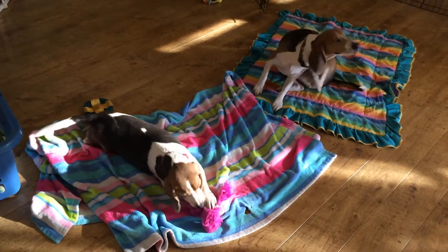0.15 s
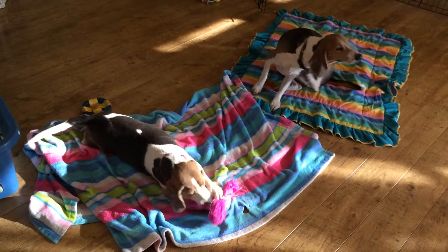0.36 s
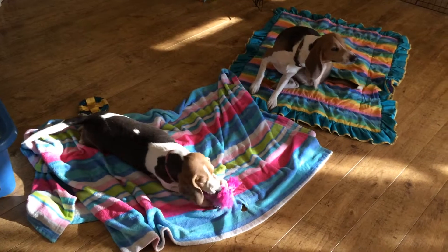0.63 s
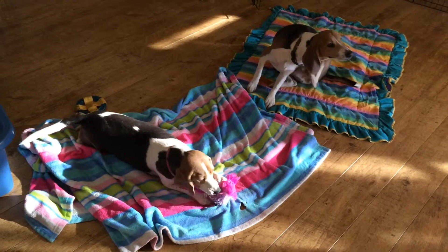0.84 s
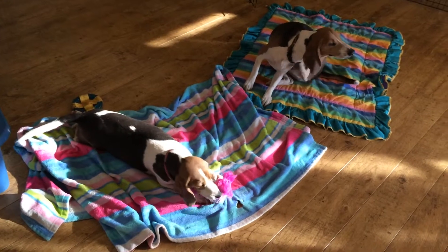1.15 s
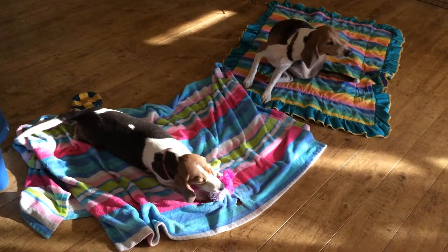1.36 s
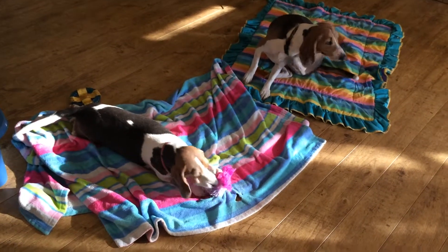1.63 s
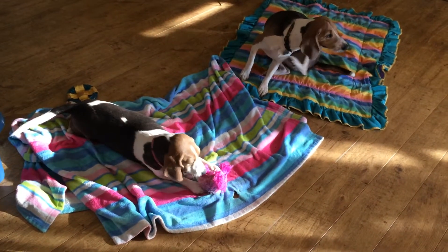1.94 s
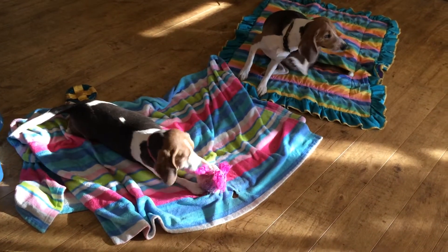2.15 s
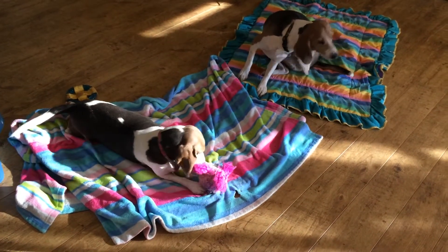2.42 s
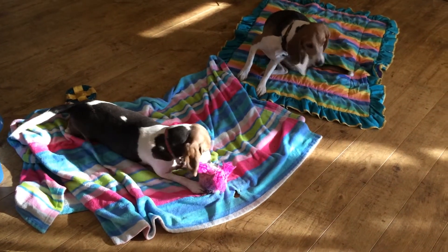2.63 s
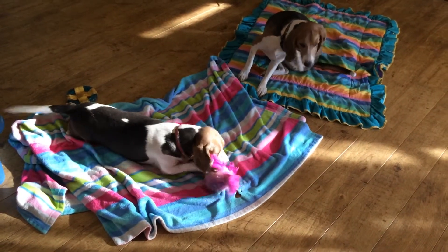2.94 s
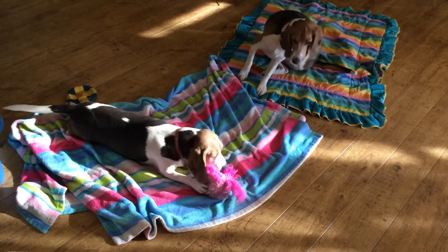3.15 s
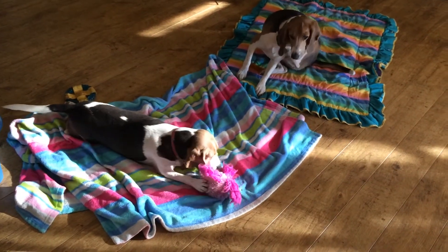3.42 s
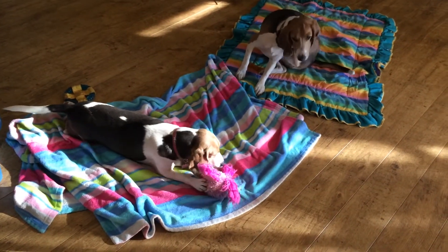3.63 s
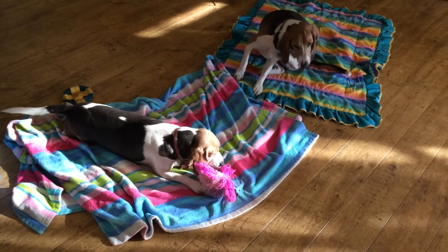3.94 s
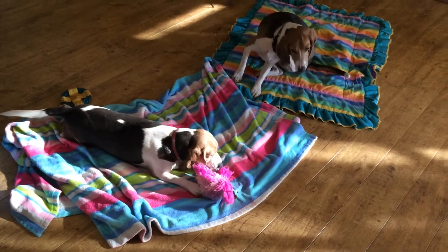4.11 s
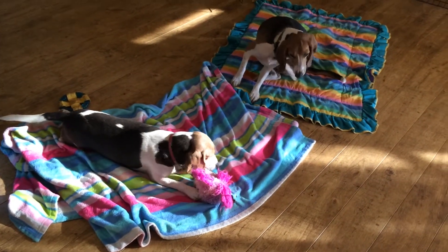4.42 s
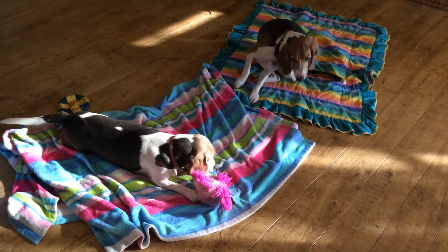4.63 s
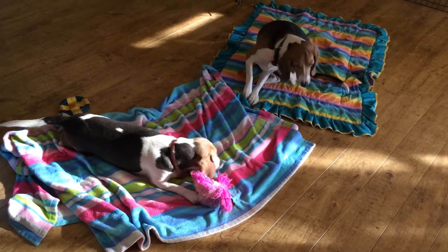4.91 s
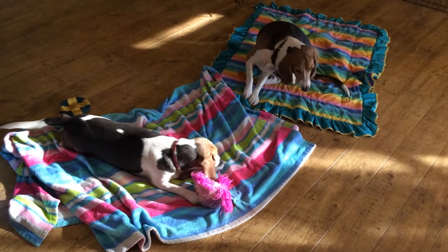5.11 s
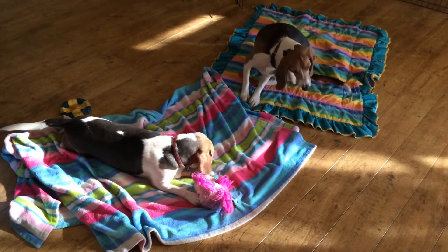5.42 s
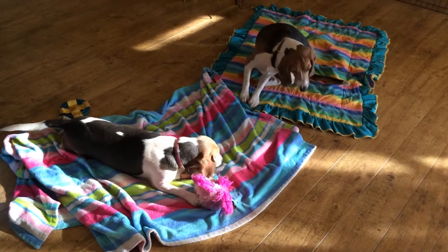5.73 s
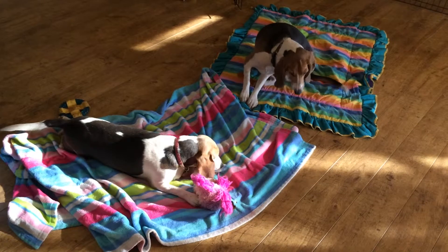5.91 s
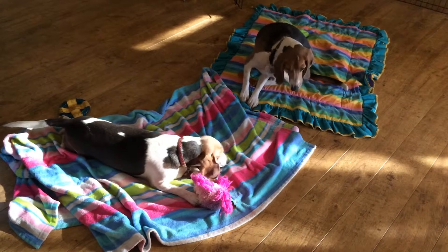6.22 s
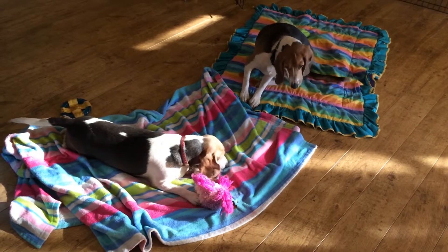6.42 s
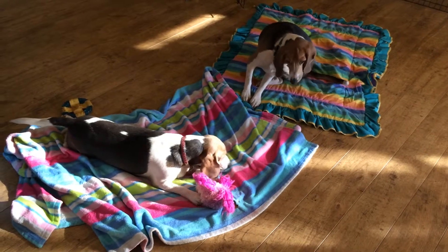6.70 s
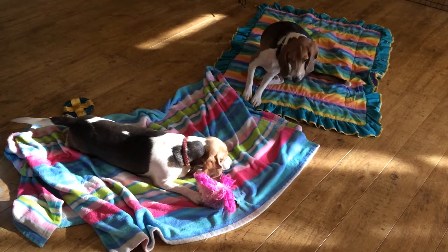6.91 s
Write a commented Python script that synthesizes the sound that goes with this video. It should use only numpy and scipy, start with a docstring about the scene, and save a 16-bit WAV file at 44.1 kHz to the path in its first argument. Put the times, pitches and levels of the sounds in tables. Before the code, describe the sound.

A dog gnaws a soft toy indoors, its metal collar tags clacking and jingling in quick irregular bursts over a faint low appliance hum.

```python
"""In a small bare room with a wooden floor, a dog worries a soft toy and its collar tags clack and ring.
Each clack is noise through damped resonances plus the decaying sine modes of two metal tags.
A scuff leads each blow and light bounces follow; a fine jingle and single low tag modes lie between.
Diffuse noise tails form the room; wavering sines form an appliance's hum and faint higher harmonics.
Shaped noise gives the room's rumble and the phone's hiss."""
import sys
import numpy as np
from scipy import signal
from scipy.fft import rfft, irfft, next_fast_len
from scipy.io import wavfile

SR = 44100
rng = np.random.default_rng(int(sys.argv[2]) if len(sys.argv) > 2 else 0)


def inscribe(sig):
    """Save sig as 16-bit PCM at rate SR to the path in sys.argv[1].

    A 1-D sig is mono; a 2-D sig holds one channel per row.
    Samples are clipped to [-1, 1] before scaling.
    """
    pcm = np.round(np.clip(np.atleast_2d(sig).T, -1, 1) * 32767)
    wavfile.write(sys.argv[1], SR, pcm.astype(np.int16))


N = 311346

# Contacts that stand out: [t/s, clack level/dB, dull knock level/dB re clack,
# blow on small tag level/dB, blow on large tag level/dB]
CONTACTS = [(0.032, -42, -22, -44, -38), (0.042, -34.5, -13, -30, -24), (0.155, -35, -15, -29.5, -31),
            (0.171, -35, -20, -31, -30.5), (0.249, -34.5, -15, -54, -46), (0.309, -35, -2.5, -56, -25.5),
            (0.415, -36, -4.5, -34, -36), (0.487, -33, -28, -49, -25), (0.503, -31, -10.5, -54, -27.5),
            (0.515, -32, -27, -54, -28), (0.641, -38.5, -10, -29, -29), (0.721, -47.5, -5.5, -62, -52),
            (0.965, -39.5, -10, -47, -42), (0.98, -36, -18, -46, -45), (1.08, -32, -15.5, -27, -34),
            (1.135, -44, -19, -59, -37), (1.216, -35, -14, -46, -45), (1.244, -34, -17, -53, -60),
            (1.314, -37, -5.5, -58, -47), (1.401, -30.5, -16.5, -30, -41), (1.519, -29, -13, -33, -42),
            (1.534, -33, -6, -34, -36), (1.541, -28.5, -8.5, -24, -45), (1.651, -35, -11, -25, -24.5),
            (1.67, -33.5, -27, -26, -27), (1.688, -27.5, -14, -22, -32), (1.756, -33.5, -14, -32, -36.5),
            (1.872, -27, -21.5, -30, -21), (1.901, -27, -20, -30, -29.5), (1.973, -29, -22, -36, -40),
            (1.983, -29.5, -30, -29, -32), (2.001, -20, -13, -18, -21.5), (2.118, -46, -20, -46, -45),
            (2.147, -20.5, -17.5, -16, -23), (2.151, -18.5, -21, -18, -26), (2.231, -16, -17.5, -16.5, -33),
            (2.249, -37, -19, -30, -35), (2.358, -37.5, -15, -21, -43), (2.367, -27, -32, -19, -29),
            (2.434, -35, -18, -31, -42), (2.445, -21, -25, -13, -25), (2.467, -31, -9, -33, -42),
            (2.488, -27, -9.5, -33, -34), (2.548, -30.5, -27, -28, -31), (2.578, -33, -31, -24, -39),
            (2.611, -29.5, -21, -29, -33), (2.663, -31.5, -15, -22, -33), (2.6843, -13, -23, -13, -20),
            (2.687, -18, -7.5, -24, -32), (2.826, -26, -12, -26, -21), (2.832, -20.5, -20, -13.5, -30),
            (2.911, -21, -14.5, -32, -37), (2.9245, -21, -17.5, -11, -23), (2.932, -23.5, -28, -16, -20.5),
            (3.047, -28.5, -26, -31, -32), (3.08, -31, -14, -26, -35), (3.11, -31, -12, -31, -35),
            (3.12, -22, -12, -33, -35), (3.131, -25.5, -6.5, -30, -41), (3.196, -33, -7.5, -36, -49),
            (3.27, -37, -19, -47, -60), (3.304, -34, -21, -35, -34), (3.37, -38.5, 1, -47, -48),
            (3.382, -23, -36, -18.5, -32), (3.395, -44, -8, -32, -26), (3.457, -35, -30, -36, -55),
            (3.519, -22.5, -9, -31, -35), (3.561, -31.5, -27, -31, -53), (3.574, -18.5, -6, -18, -25),
            (3.592, -20, -32, -21, -26), (3.687, -33, -15, -31, -23.5), (3.751, -19, -15, -15.5, -15.5),
            (3.985, -38.5, -17, -45, -49), (4.043, -34, -10, -19, -35), (4.053, -18.5, -28, -32, -23),
            (4.07, -23.5, -13, -57, -49), (4.181, -28, -19, -32, -25.5), (4.217, -22.5, -14, -16, -21.5),
            (4.279, -28.5, -16, -22, -25.5), (4.407, -32.5, -21, -24, -35), (4.449, -27.5, -12.5, -24, -23),
            (4.504, -32.5, -26, -38, -33), (4.547, -28.5, -8, -59, -52), (4.5592, -24.5, -23, -29, -27),
            (4.588, -30.5, -32, -37, -28), (4.637, -38, -14, -33, -42), (4.6821, -23.5, -13, -27, -31),
            (4.748, -25, -12.5, -23, -50), (4.873, -43, -30, -42, -40), (4.885, -21, -30, -11.5, -31),
            (4.918, -26, -22.5, -31, -25.5), (4.949, -31, -21, -29, -35), (4.991, -33, -9.5, -50, -39),
            (5.041, -38, -17, -39, -35), (5.137, -26, -14, -31, -25), (5.14, -25.5, -15.5, -39, -25),
            (5.266, -48, -25, -48, -56), (5.45, -22.5, -21, -22, -23), (5.58, -35.5, -17, -46, -46),
            (5.632, -37, -15, -28, -45), (5.647, -30, -17, -28, -41), (5.6578, -14.5, -8, -37, -59),
            (5.662, -21, -8.5, -19, -30), (5.815, -34, -15.5, -34, -36), (5.91, -20, -14.5, -17.5, -36),
            (5.957, -32, -27, -25, -39), (6.048, -37, -5, -51, -52), (6.078, -24, -16.5, -19, -28),
            (6.142, -34, -26, -31, -45), (6.276, -38, -20, -33, -55), (6.3, -24, -23, -37, -32),
            (6.307, -26.5, -15, -36, -42), (6.35, -35, -12, -38, -42), (6.364, -18, -9.5, -29, -28),
            (6.501, -46, -22, -38, -48), (6.517, -25, -19, -18, -22), (6.583, -27.5, -20, -30, -30),
            (6.6123, -20, -12.5, -23, -31), (6.711, -33, -22, -29, -34), (6.779, -30.5, -23, -23, -36),
            (6.848, -40, -34, -35, -38), (6.867, -34, -7, -40, -52), (6.876, -32.5, -22, -34, -38),
            (7.003, -27.5, -21, -43, -45), (7.0323, -35.5, -18, -28, -26)]
# Damped resonances of a contact: [f/Hz, width of one resonator/Hz, relative level/dB]
KNOCK_RESONANCES = [(1760, 1590, -2), (2924, 800, 4), (4220, 2100, 2.5)]
CLACK_RESONANCES = [(4510, 1280, -10.5), (6390, 2150, -5), (8183, 1100, 3.5), (9315, 1110, -5.5),
                    (11050, 1100, -5.5)]
TICK_RESONANCES = [(12500, 800, -1), (14550, 700, 0)]  # first row for the large tag, second for the small
# Modes of the tags: [f/Hz, relative level/dB, middle T60/s]
SMALL_TAG_MODES = [(4670, -30, 0.34), (9330, -9, 0.13), (14730, 0, 0.083)]
LARGE_TAG_MODES = [(4220, -32, 0.36), (7700, -16, 0.12), (8130, -10.5, 0.14), (12300, -1.5, 0.19),
                   (12760, -5.5, .17)]
# Middle level of each hum line: [f/Hz, level/dB]; the first line takes its level from HUM_SWELL
HUM_LINES = [(59.2, -51), (118.4, -62), (193.8, -64.5), (258.4, -63)]
# Slow swell of the lowest hum line: [t/s, level/dB]
HUM_SWELL = [(0.1, -51.5), (0.7, -47), (2.6, -48.5), (4.0, -52), (4.8, -49.5), (5.2, -46.5), (6.0, -47),
             (6.4, -52.5), (7.0, -50)]
# Spectral shape of rumble and hiss: [f/Hz, relative density level/dB per Hz]
AIR_SPECTRUM = [(30, -7.5), (60, -7), (110, -8), (250, -11), (400, -21), (700, -25), (2000, -29.5),
                (5000, -37.5), (15000, -47)]
# Reverberation time of the room: [f/Hz, T60/s]
ROOM_T60 = [(1000, 0.26), (3000, 0.53), (7000, 0.3), (14000, 0.2)]
# Faint higher harmonics of the motor that come and go: [f/Hz, middle level/dB, start t/s, end t/s]
MOTOR_TONES = [(522, -71, 0, 1.6), (764, -74, 1.6, 3.1), (930, -74, .95, 1.3), (945, -72, 2.2, 2.45),
               (1179, -76, 2.9, 6.9)]
# How busily the collar shivers between blows: [t/s, base level of the fine jingle/dB]
SHIVER_LEVEL = [(0, -48), (0.2, -45), (0.45, -55.5), (0.8, -58), (1.3, -58), (1.8, -68), (2.3, -61),
                (3.15, -49), (3.5, -50), (3.9, -58.5), (4.4, -93), (5.0, -46), (5.3, -67), (5.75, -53.5),
                (6.2, -66), (6.45, -46), (7.0, -65)]
# How freely the tags hang clear of the fur:
# [t/s, small tag ring level/dB re blow, large tag ring level/dB re blow]
TAG_FREEDOM = [(0, 3, -8.5), (0.8, -21, -12), (1.5, -14, -6), (2.4, -15, -8.5), (3.2, -5, -4.5),
               (4.2, -12, -14), (5.2, -0.5, -6.5), (6.1, -6, 2), (7.0, -7, -20)]
# Blows that set one low mode of a tag or ring humming: [t/s, mode f/Hz, level/dB]
FACE_BLOWS = [(0.044, 4670, -46), (0.56, 4670, -46), (0.65, 4670, -52), (1.874, 4200, -49),
              (2.004, 2934, -50.5), (2.03, 4600, -58), (2.49, 3016, -48), (2.931, 4220, -43),
              (3.388, 4220, -42), (3.6, 4220, -40.5), (4.561, 4670, -42), (6.082, 4220, -53),
              (6.868, 3170, -55.5)]
# Pitch of the clack, lower while the collar hangs slack: [t/s, pitch factor]
CLACK_PITCH = [(0.7, 1.02), (1.15, 0.77), (1.5, 1.016), (1.9, 1.12)]

AIR_DB = -53  # rms level
# Swing of a tag: random phase and strength, and how many new values are drawn a second
SWING_RAD, SWING_DB, SWING_RATE_HZ = 0.8, 3.5, 70
SWING_AT_HZ = 12000  # in ring(), phase and strength scale with mode pitch over this one
MIDDLE_CLACK_DB = -30
RING_LOSS = 0.19  # dB of ring lost per dB of clack above the middle
FACE_T60_S = 0.22
STEP_HZ, CUT_HZ = 15120, 16500


def undb(db):
    """Amplitude ratio: 20 dB for each factor of ten."""
    return 10 ** (np.asarray(db) / 20)


def unit(x):
    """Normalization by signal power: each row gets rms 1."""
    return x / np.sqrt(np.mean(x ** 2, axis=-1, keepdims=True))


def decay(t, t60):
    """Exponential decay: amplitude falls by 60 dB in t60 seconds."""
    return np.exp(-np.log(1000) * t / t60)


def on_log_hz(table, hz):
    """Logarithmic pitch scale: values are interpolated along log frequency."""
    f, v = np.transpose(table)
    return np.interp(np.log(np.maximum(hz, 1)), np.log(f), v)


def sway(rows, t, rate_hz):
    """Irregular modulation: random values, rate_hz a second, joined by straight lines."""
    place = t * rate_hz
    knots = rng.standard_normal((rows, 2 + int(place[-1])))
    return np.array([np.interp(place, np.arange(len(row)), row) for row in knots])


def add(out, starts_s, sounds):
    """Superposition: each row is mixed in at its start time."""
    for s, row in zip(starts_s, sounds):
        i = int(s * SR)
        out[i:i + len(row)] += row[:max(N - i, 0)]


def air():
    """Broadband noise: random pressure with a falling spectrum gives room rumble and microphone hiss."""
    size = next_fast_len(N)
    hz = np.arange(size // 2 + 1) * SR / size
    spectrum = rfft(rng.standard_normal(size)) * undb(on_log_hz(AIR_SPECTRUM, hz))
    return undb(AIR_DB) * unit(irfft(spectrum, size)[:N])


def appliance():
    """Tonal motor noise: sine lines waver in pitch and strength, and the lowest swells slowly."""
    t, out = np.arange(N) / SR, 0
    knots = np.arange(0, t[-1] + 1, 0.12)
    for k, (hz, db) in enumerate(HUM_LINES):
        drift = np.interp(t, knots, rng.standard_normal(len(knots)))
        flutter = np.interp(t, knots, rng.standard_normal(len(knots)))
        if k == 0:
            level_db = np.interp(t, *np.transpose(HUM_SWELL)) + flutter
        else:
            level_db = db + 3.2 * flutter
        phase = 2 * np.pi * np.cumsum(hz * (1 + 0.014 * drift)) / SR
        out = out + np.sqrt(2) * undb(level_db) * np.sin(phase)
    return out


def motor_tones():
    """Random amplitude and phase modulation: it blurs the motor's faint higher harmonics."""
    t, out = np.arange(N) / SR, 0
    for hz, db, start, end in MOTOR_TONES:
        gate = np.clip(np.minimum(t - start, end - t) / 0.025, 0, 1)
        waver, drift = sway(2, t, 22)
        tone = np.sin(2 * np.pi * hz * t + 1.5 * drift)
        out = out + np.sqrt(2) * undb(db + 4 * waver) * gate * tone
    return out


def rattle(modes, db, scatter_db=3, rise_s=0.00028, fall_s=0.003, spread=0.47, pitch=1, shift=0.018):
    """Source and filter: brief edge chatter excites damped resonances that shift with every contact."""
    size = 1024
    t, hz = np.arange(size) / SR, np.arange(1, size // 2 + 2) * SR / size
    fall = fall_s * np.exp(spread * rng.standard_normal((len(db), 1)))
    shape = (1 - np.exp(-t / rise_s)) * np.exp(-t / fall)
    # edges meet in several uneven slips
    shape = shape * undb(5 * sway(len(db), t, 900))
    shape = shape / shape.max(axis=1, keepdims=True)
    body = 0
    for k, (f, width, gain_db) in enumerate(modes):
        chance = rng.standard_normal((len(db), 2))
        centre = f * pitch * np.exp(shift * chance[:, :1])
        resonator = 1 / (1 + 1j * (hz / centre - centre / hz) * centre / width)
        # two equal resonators in series; neighbours have opposite sign
        body = body + (-1) ** k * undb(gain_db + scatter_db * chance[:, 1:]) * resonator ** 2
    chatter = rng.standard_normal(shape.shape) * shape
    sound = unit(irfft(rfft(chatter) * body))
    shape_rms = np.sqrt(np.mean(shape ** 2, axis=1, keepdims=True))
    return undb(db)[:, None] * sound * shape_rms


def shiver(count=2200):
    """Driven resonance: many tiny random contacts tick and keep the held tags' modes faintly ringing."""
    s, size = np.transpose(rng.random((count, 2)))
    s = s * N / SR
    tick_db = np.interp(s, *np.transpose(SHIVER_LEVEL)) - 2.2 * np.log(size)
    ticks = np.zeros(N)
    add(ticks, s, rattle(CLACK_RESONANCES + TICK_RESONANCES, tick_db, fall_s=0.001))
    glow = 0
    for f, gain_db, t60 in SMALL_TAG_MODES + LARGE_TAG_MODES:
        # a held tag decays in 0.21 of its middle time
        pole = np.exp(2j * np.pi * f / SR - np.log(1000) / (0.21 * t60 * SR))
        glow = glow + undb(gain_db) * signal.lfilter([1], [1, -pole], ticks).imag
    return ticks + undb(-28.0) * glow


def ring(modes, db, scatter_db=4.5, detune=0.0018, grip=0.2):
    """Modal vibration: strike point sets mode strengths, fur alters decay, swinging makes the ring glint."""
    t, out = np.arange(int(0.25 * SR), dtype=np.float32) / SR, 0
    for f, gain_db, t60 in modes:
        chance = rng.standard_normal((len(db), 3)).astype(np.float32)
        fade = decay(t, t60 * np.exp(grip * chance[:, :1]))
        # turning toward and away shifts both the path length and the strength
        swing = f / SWING_AT_HZ
        path_rad = SWING_RAD * swing * sway(len(db), t, SWING_RATE_HZ)
        tone = np.sin(2 * np.pi * f * (1 + detune * chance[:, 1:2]) * t + path_rad)
        glint_db = SWING_DB * swing * sway(len(db), t, SWING_RATE_HZ)
        level_db = db[:, None] + gain_db + scatter_db * chance[:, 2:] + glint_db
        out = out + undb(level_db) * fade * tone
    return out


def blows(count=9):
    """Impact excitation: struck tags clack and ring, led by a scuff and followed by weakening bounces."""
    s, clack_db, knock_db, small_db, large_db = np.transpose(CONTACTS)
    large_tick, small_tick = TICK_RESONANCES
    when, small_free, large_free = np.transpose(TAG_FREEDOM)
    small_free_db, large_free_db = np.interp(s, when, small_free), np.interp(s, when, large_free)
    loss_db = RING_LOSS * (clack_db - MIDDLE_CLACK_DB)
    pitch = np.interp(s, *np.transpose(CLACK_PITCH))[:, None]
    edges = CLACK_RESONANCES + TICK_RESONANCES
    out = np.zeros(N)
    add(out, s, rattle(CLACK_RESONANCES, clack_db, pitch=pitch))
    add(out, s, rattle([small_tick], small_db, rise_s=0.00049))
    add(out, s, rattle([large_tick], large_db, rise_s=0.00045))
    add(out, s, rattle(KNOCK_RESONANCES, clack_db + knock_db, scatter_db=1.5, fall_s=0.006, shift=0.06))
    add(out, s, ring(SMALL_TAG_MODES, small_db + small_free_db - loss_db))
    add(out, s, ring(LARGE_TAG_MODES, large_db + large_free_db - loss_db))
    # the earlier a scuff starts, the weaker it is
    early = rng.exponential(0.0046, len(s))
    scuff = rattle(edges, clack_db - 13.0 - 600 * early, rise_s=0.0039, fall_s=0.013)
    add(out, np.maximum(s - 0.002 - early, 0), scuff)
    # later bounces tend to be weaker
    wait = rng.exponential(0.033, (len(s), count))
    bounce_db = clack_db[:, None] - 14.5 - 150 * wait + 2 * rng.standard_normal(wait.shape)
    add(out, (s[:, None] + 0.0019 + wait).ravel(), rattle(edges, bounce_db.ravel(), fall_s=0.0011))
    return out


def tail(gap_s=0.001, build_s=0.0068):
    """Diffuse reverberation: half-octave bands of noise build up, each dying at its own rate."""
    t, out = np.arange(SR // 2) / SR, 0
    for hz in 1000 * 2 ** np.arange(0, 4.5, 0.5):
        edges_hz = [hz / 2 ** 0.25, hz * 2 ** 0.25]
        band = signal.butter(2, edges_hz, "band", fs=SR, output="sos")
        noise = signal.sosfilt(band, rng.standard_normal(len(t)))
        out = out + decay(t, on_log_hz(ROOM_T60, hz)) * noise
    out = out * (1 - np.exp(-np.maximum(t - gap_s, 0) / build_s))
    return out / np.sqrt(np.sum(out ** 2))


def room(dry, count=6):
    """Convolution: random tails take turns, each fed for 2048 samples, so no single tail colours the room."""
    turn = np.arange(N) // 2048 % count
    return sum(signal.oaconvolve(dry * (turn == k), tail())[:N] for k in range(count))


def face_blows():
    """Single-mode vibration: one low mode decays alone, wavering as the tag swings."""
    s, hz, db = np.transpose(FACE_BLOWS)
    t = np.arange(SR // 4) / SR
    waver, drift = sway(len(s), t, SWING_RATE_HZ), sway(len(s), t, SWING_RATE_HZ)
    strength = decay(t, FACE_T60_S) * undb(db[:, None] + SWING_DB * waver)
    out = np.zeros(N)
    add(out, s, strength * np.sin(2 * np.pi * hz[:, None] * t + SWING_RAD * drift))
    return out


def scene():
    """Superposition of sources: tags near the floor, their room tail, hum, motor tones and air."""
    tags = blows() + face_blows() + shiver()
    return (tags + undb(-10) * room(tags) + appliance() + motor_tones() + air())[None]


def record(dry):
    """Band limiting: deep bass is lost, a steep step down above 15 kHz, little above 16.5 kHz."""
    bass_cut = signal.sosfilt(signal.butter(2, 42, "high", fs=SR, output="sos"), dry)
    # the elliptic stopband lies 24 dB down
    stepped = signal.sosfilt(signal.ellip(6, 0.5, 24, STEP_HZ, fs=SR, output="sos"), bass_cut)
    return signal.sosfilt(signal.ellip(10, 0.2, 60, CUT_HZ, fs=SR, output="sos"), stepped)


dry = scene()
out = record(dry)
inscribe(out)
```